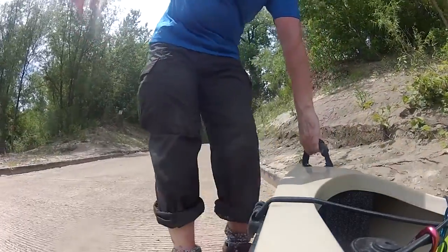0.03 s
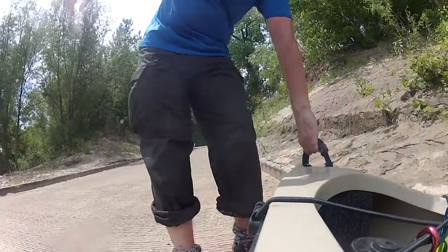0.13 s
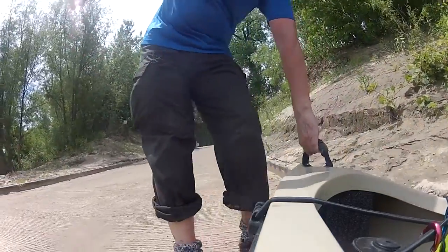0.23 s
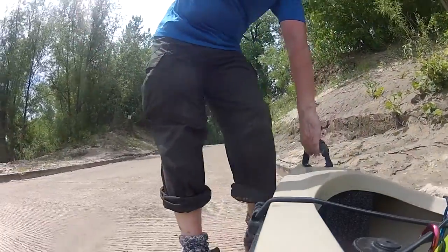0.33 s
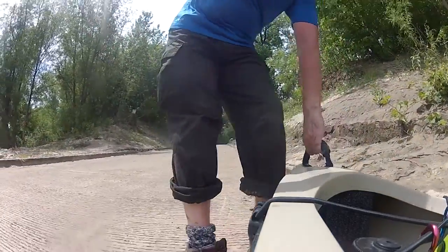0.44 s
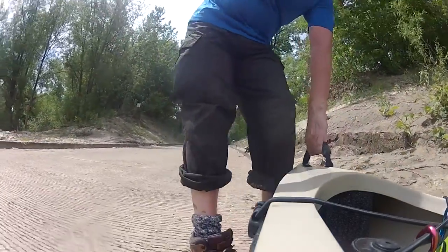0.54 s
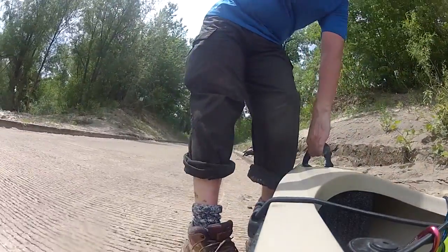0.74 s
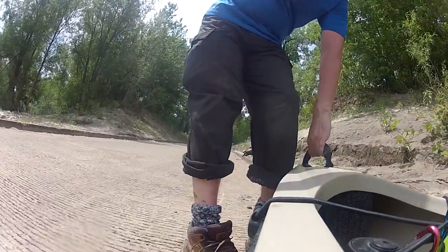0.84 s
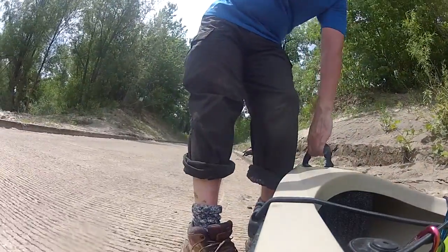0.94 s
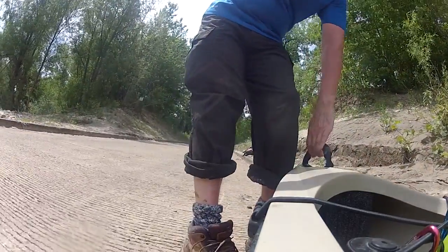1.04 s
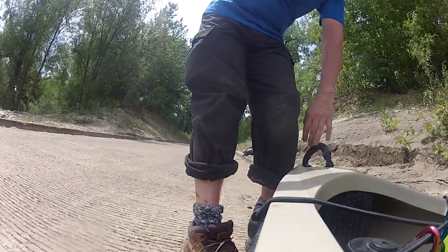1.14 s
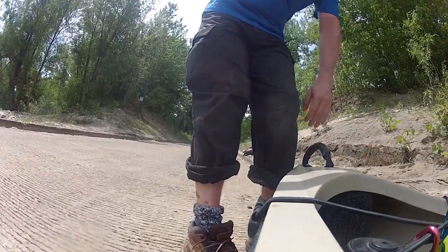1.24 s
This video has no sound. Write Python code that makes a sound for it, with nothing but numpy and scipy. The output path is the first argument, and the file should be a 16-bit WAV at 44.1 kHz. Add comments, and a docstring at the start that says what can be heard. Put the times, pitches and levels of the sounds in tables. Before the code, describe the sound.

Close on the hull, outdoors: near quiet, then a sudden hollow double knock and boom, grinding plastic with crisp ticks, a second burst of rattling knocks over concrete ridges, settling to almost nothing.

```python
"""A faint hollow squawk is heard first, over grit and air; then a plastic kayak is dragged up rough concrete.
It moves in two jerks, heard from its deck: ridges knock the hull, and brief uneven tones give the squawks of
slipping plastic and the hollow tonal knocks of the first impact. Grit rings the shell's resonances, the floor
booms as decaying sines, and noise bursts make crisp ticks.
A low-rate sample-and-hold mirrors the sound into a thin, glassy treble."""
import sys
import numpy as np
from scipy import signal
from scipy.fft import rfft, irfft
from scipy.io import wavfile
from scipy.ndimage import uniform_filter1d

SR = 44100
rng = np.random.default_rng(int(sys.argv[2]) if len(sys.argv) > 2 else 0)


def pcm_store(signal):
    """Save signal as 16-bit PCM."""
    levels = np.round(np.clip(np.atleast_2d(signal), -1, 1) * 32767)
    wavfile.write(sys.argv[1], SR, levels.astype(np.int16).T)


N = 57330
T = np.arange(N) / SR  # time in seconds

# Keel meets ridges: start_s, rise_s, crunch_decay_s, then peak short-term levels
# thud_db, low_knock_db, high_knock_db, crack_db, and the force's low-pass corner dull_above_hz
RIDGE_KNOCKS = [(0.1900, 0.0047, 0.0065, -64, -69, -57, -53, 5000),
                (0.2435, 0.0076, 0.0086, -20, -20, -12, -21.5, 6450),
                (0.257, .005, 0.012, -23, -21, -15.5, -31.5, 4500),
                (0.6345, .001, 0.0063, -38, -62, -25.5, -39, 2800),
                (0.7105, 0.0016, 0.0057, -20.5, -14, -22, -39, 2550),
                (0.7220, .002, 0.0054, -16, -19.5, -23.5, -30, 5200),
                (0.7400, .002, 0.0074, -18.5, -21.5, -31, -42, 4000),
                (0.7776, .001, 0.0043, -41, -36, -32.5, -65, 2500),
                (0.8440, 0.0085, 0.0057, -29.5, -25.5, -26.5, -37, 2350),
                (0.9065, 0.0013, 0.012, -30, -31.5, -32.5, -47, 2030),
                (0.9380, 0.0036, 0.0075, -27.5, -33, -44, -45, 4500),
                (0.9745, 0.004026, 0.0032, -31.5, -30.5, -27, -31, 1740),
                (1.0185, 0.0015, 0.0053, -34, -37.5, -46, -49, 2000),
                (1.0850, 0.0021, 0.0061, -47, -42, -42, -48.5, 2200),
                (1.2215, 0.0004, 0.0036, -51.5, -54, -46.5, -69, 2200)]
# Borders of the thud, low knock, high knock and crack registers: edge_hz
REGISTER_EDGES_HZ = [85, 260, 570, 1420, 5900]
CRUNCH_GRAINS_PER_S = 3000
CONTACT_DB = 5.5  # first hard contact, against the smallest grain
AFTER_RING_DB, AFTER_RING_S = -14.5, 0.016  # weaker tail of the crunch: start level, decay time

# Brief tones: slipping plastic squawks, and hollow tonal knocks of the hull at the first impact:
# start_s, length_s, pitch_hz, start_level_db, pitch_unevenness (share of pitch)
HOLLOW_TONES = [(0.0, 0.042, 893, -45.5, 0.11), (0.10, 0.035, 2080, -53.5, 0.041),
                (0.2473, 0.0142, 480, -11.5, 0.033), (0.2611, 0.023, 661, -11, 0.048),
                (0.7106, 0.0154, 703.5, -10.5, 0.029), (0.848, 0.027, 677, -30.5, 0.096),
                (0.9781, 0.0064, 697, -19.5, 0.046), (1.086, .012, 918, -41, 0.094)]
TONE_EDGE_S, WOBBLE_BANDWIDTH_HZ, TONE_FADE_DB = 0.0012, 130, 3  # the fade spans one tone

# Grinding under the keel: time_s, shell_level_db, gritty_upper_level_db
GRIND_LEVELS = [(0.0, -62.5, -53), (0.072, -64.5, -64.5), (0.237, -54.5, -63), (0.255, -27, -55),
                (0.308, -26, -42.5), (0.348, -34.5, -41), (0.408, -27, -39), (0.479, -35.5, -43),
                (0.548, -39, -48.5), (0.622, -37, -45), (0.68, -34, -40.5), (0.80, -35, -47),
                (0.891, -35.5, -51), (0.96, -49, -57.5), (1.05, -47.5, -53), (1.13, -45, -55),
                (1.212, -53, -59.5), (1.3, -64, -74)]
GRAINS_PER_S, GRAIN_SPREAD_DB = 1800, 1.5
JUDDER_DB, JUDDER_BANDWIDTH_HZ = 0.5, 51

# Resonances of the shell: centre_hz, lift_db, width_hz
SHELL_MODES = [(104.7, 7.5, 19), (192, 5, 48), (340.4, 4, 19), (421.5, 6, 17), (622, -7, 11),
               (671.6, 11.5, 45), (764, 4.5, 41), (993.5, 11, 71), (1010, 12, 21), (1263.4, 11.5, 42),
               (1697, 4.5, 71), (2003, 1, 78), (2120, 5, 24), (2938, 5, 63), (3530, 8.5, 94)]
# Broad colour of the shell under its resonances: frequency_hz, relative_gain_db
SHELL_COLOUR = [(60, -18.5), (110, -1), (250, 0), (370, -1), (500, -6.5), (800, -3.5), (1100, -13.5),
                (1450, -19.5), (1800, -13), (2500, -26.5), (3400, -26), (4100, -32), (5000, -35),
                (6000, -44)]

# Flexing of the hull floor: start_s, peak_db, pitch_hz, rise_s, t60_s
FLOOR_BOOMS = [(0.257, -15.5, 51.2, 0.014, 0.49), (0.330, -14.5, 54, 0.028, 0.041),
               (0.404, -22, 70.6, 0.031, 0.15), (0.728, -11.5, 50.7, 0.0067, 0.71),
               (0.726, -16.5, 110.3, 0.0055, 0.092), (0.905, -10, 60.26, 0.031, 0.36)]
# Low rumble of the floor: time_s, level_db
RUMBLE_LEVELS = [(0.0, -55), (0.23, -60), (0.27, -24), (0.47, -37.5), (0.55, -39), (0.70, -35.5),
                 (1.0, -26.5), (1.16, -39.5), (1.25, -38), (1.3, -56)]
# Spectrum of that rumble: frequency_hz, relative_density_db (per Hz)
RUMBLE_COLOUR = [(20, -22), (40, -7.5), (55, -0.5), (75, -7), (100, -19), (140, -30.5), (500, -94)]

# Crisp ticks: start_s, peak_level_db, length_s
TICKS = [(0.307, -37, 0.0018), (0.3125, -28.5, 0.0024), (0.346, -44, 0.004), (0.347, -38.5, .003),
         (0.353, -40, 0.0057), (0.362, -37, 0.0087), (0.371, -50, 0.0026), (0.6, -42.5, 0.0051),
         (0.781, -46, .002), (0.892, -47.5, 0.0048), (0.953, -46, 0.0036), (0.961, -43, .003),
         (0.970, -44, .003), (0.987, -50.5, 0.012), (1.185, -55, 0.0056)]
# Spectrum shared by the ticks: frequency_hz, relative_density_db (per Hz)
TICK_COLOUR = [(2500, -14), (3700, -15), (4500, 4), (5400, 0.5), (6000, -3)]

# Spectrum of the outdoor air: frequency_hz, relative_density_db (per Hz)
AIR_COLOUR = [(25, 10), (55, 12.5), (100, 0.5), (300, -5), (600, -11), (900, -18), (1400, -31),
              (2100, -14.5), (2800, -19), (6000, -25), (10000, -33), (15000, -55)]
AIR_DB = -55  # rms level

HOLD_RATE_HZ, CUTOFF_HZ = 12000, 15500


def from_db(db):
    """Logarithmic level: 20 dB is a tenfold amplitude."""
    return 10 ** (np.asarray(db) / 20)


def rms_one(x):
    """Normalisation: scale to unit root-mean-square."""
    return x / np.sqrt(np.mean(x ** 2) + 1e-20)


def band(x, low, high):
    """Causal band-pass filtering: keep one frequency register."""
    sos = signal.butter(3, [low, high], "band", fs=SR, output="sos")
    return signal.sosfilt(sos, x + 1e-18)


def noise(spectrum):
    """Random-phase synthesis: a given spectrum with random phases is coloured noise, here of rms 1."""
    hz, db = np.transpose(spectrum)
    frequencies = np.fft.rfftfreq(N, 1 / SR)
    gain = from_db(np.interp(np.log(frequencies + 1), np.log(hz), db))
    phases = np.exp(2j * np.pi * rng.random(len(gain)))
    return rms_one(irfft(gain * phases, N))


def drift(bandwidth_hz):
    """Band-limited fluctuation: low-frequency noise wanders at random with unit rms."""
    return noise([(1, 0), (bandwidth_hz, 0), (bandwidth_hz * 2, -20), (bandwidth_hz * 10, -100)])


def running_rms(x, size):
    """Short-term level: root-mean-square over a centred window of samples."""
    return np.sqrt(np.maximum(uniform_filter1d(x ** 2, size), 0) + 1e-16)


def grit(per_s):
    """Impulsive friction: grains catch and let go as random clicks of uneven size and either sign."""
    level_db = GRAIN_SPREAD_DB * np.minimum(rng.exponential(1, N), 4)
    sizes = from_db(level_db) * rng.choice([-1, 1], N)
    happens = rng.random(N) < per_s / SR
    return sizes * happens


def excite(force, response):
    """Superposition: every instant of force launches its own copy of the response."""
    return signal.fftconvolve(force, response)[:N]


def hull_response():
    """Modal resonance: the shell's minimum-phase answer to one click, peaks standing on a broad colour."""
    size = 16384
    f = np.fft.rfftfreq(size, 1 / SR) + 1e-3
    hz, db = np.transpose(SHELL_COLOUR)
    colour = from_db(np.interp(np.log(f), np.log(hz), db))
    peaks = np.zeros(len(f))
    for centre, lift, width in SHELL_MODES:
        peaks += (from_db(lift) ** 2 - 1) / (1 + (2 * (f - centre) / width) ** 2)
    gain = colour * np.sqrt(np.maximum(1 + peaks, .1))
    # Folding the cepstrum onto positive times makes the response causal
    cepstrum = irfft(np.log(gain))[:size // 2]
    cepstrum[0] = 0  # sets the average log gain to zero
    return irfft(np.exp(rfft(2 * cepstrum, size)))[:size // 2]


def knocks(hull):
    """Impact excitation: a hard contact amid crunching grains; where it strikes sets each register's strength."""
    registers = [band(hull, lo, hi) for lo, hi in zip(REGISTER_EDGES_HZ, REGISTER_EDGES_HZ[1:])]
    out = np.zeros(N)
    for start, rise, crunch_decay, *levels_db, dull_hz in RIDGE_KNOCKS:
        age = np.maximum(T - start - rise, 0)
        onset = np.clip((T - start) / rise, 0, 1)
        decay = np.exp(-age / crunch_decay) + from_db(AFTER_RING_DB) * np.exp(-age / AFTER_RING_S)
        force = onset * decay * grit(CRUNCH_GRAINS_PER_S)
        force[int((start + rise) * SR)] += from_db(CONTACT_DB)
        dulling = signal.butter(3, min(dull_hz, .4 * SR), fs=SR, output="sos")
        force = signal.sosfilt(dulling, force + 1e-18)
        for response, db in zip(registers, levels_db):
            ring = excite(force, response)
            out += from_db(db) * ring / running_rms(ring, size=441).max()
    return out


def hollow_tones():
    """Frequency modulation: brief, slightly uneven sines, as squawks of plastic or tonal knocks of the hull."""
    out = np.zeros(N)
    for start, length, hz, db, unevenness in HOLLOW_TONES:
        age = np.clip(T - start, 0, length)
        edges = np.clip(np.minimum(age, length - age) / TONE_EDGE_S, 0, 1)
        swell = edges * from_db(db - TONE_FADE_DB * age / length)
        pitch = hz * (1 + unevenness * drift(WOBBLE_BANDWIDTH_HZ))
        cycles = np.cumsum(pitch * (T > start)) / SR
        out += swell * np.sin(2 * np.pi * cycles)
    return out


def at_level(x, level_db):
    """Level control: divide out the short-term level, then impose the wanted one."""
    return from_db(level_db) * x / running_rms(x, size=2000)


def grinding(hull):
    """Frictional excitation: a juddering stream of grit rings the shell, in a lower and a gritty upper range."""
    time, shell_db, gritty_db = np.transpose(GRIND_LEVELS)
    judder = from_db(JUDDER_DB * drift(JUDDER_BANDWIDTH_HZ))
    ring = excite(grit(GRAINS_PER_S) * judder, hull)
    low, split, high = REGISTER_EDGES_HZ[0], REGISTER_EDGES_HZ[-2], REGISTER_EDGES_HZ[-1]
    shell = at_level(band(ring, low, split), np.interp(T, time, shell_db))
    gritty = at_level(band(ring, split, high), np.interp(T, time, gritty_db))
    return shell + gritty


def booms():
    """Damped oscillation: the floor swells into a deep swing as weight comes on it, then rings out."""
    out = np.zeros(N)
    for start, db, hz, rise, t60 in FLOOR_BOOMS:
        age = np.maximum(T - start, 0)
        onset = np.minimum(age / rise, 1)
        decay = from_db(db - 60 * np.maximum(age - rise, 0) / t60)
        out += onset * decay * np.sin(2 * np.pi * hz * age)
    return out


def rumble():
    """Broadband low-frequency vibration: coloured noise follows the floor's changing level."""
    return at_level(noise(RUMBLE_COLOUR), np.interp(T, *np.transpose(RUMBLE_LEVELS)))


def ticks():
    """Unresonant transients: bell-shaped bursts of bright noise that do not ring the hull."""
    envelope = np.zeros(N)
    for start, db, length in TICKS:
        envelope += from_db(db) * np.exp(-(2 * (T - start) / length - 1) ** 2 / 2)
    return noise(TICK_COLOUR) * envelope


def air():
    """Stationary random sound: the outdoor air is steady coloured noise."""
    return from_db(AIR_DB) * noise(AIR_COLOUR)


def scene():
    """Linear superposition: the hull's sounds add to the outdoor air."""
    hull = hull_response()
    hull_sounds = knocks(hull) + hollow_tones() + grinding(hull) + booms() + rumble() + ticks()
    return (hull_sounds + air())[None]


def sample_and_hold(x):
    """Spectral imaging: holding low-rate samples makes steps that mirror the spectrum around that rate."""
    coarse = signal.resample_poly(x, HOLD_RATE_HZ, SR, axis=-1)
    held = np.repeat(coarse, 4, axis=-1)
    return signal.resample_poly(held, SR, 4 * HOLD_RATE_HZ, axis=-1)[..., :N]


def record(dry):
    """Saturation and sampling: peaks are rounded, the band narrowed, samples held and the top cut."""
    rounded = 1.3 * np.tanh(dry / 1.3)
    before_hold = signal.ellip(8, .3, 60, 5950, fs=SR, output="sos")  # just under half the hold rate
    held = sample_and_hold(signal.sosfilt(before_hold, rounded))
    top_cut = signal.ellip(10, .2, 80, CUTOFF_HZ, fs=SR, output="sos")
    return signal.sosfilt(top_cut, held)


dry = scene()
out = record(dry)
pcm_store(out)
```